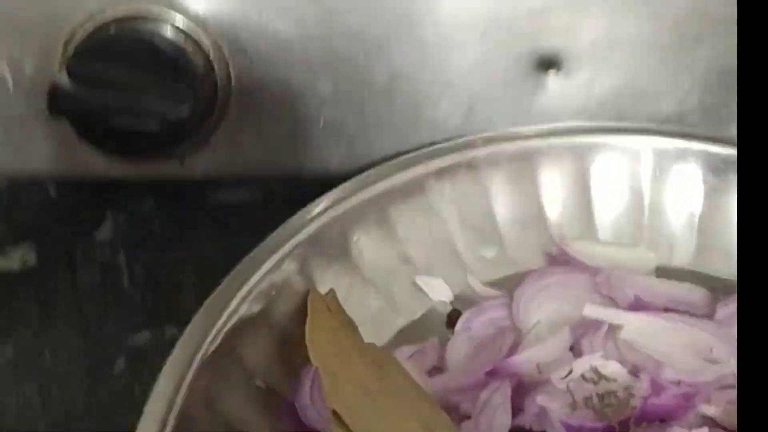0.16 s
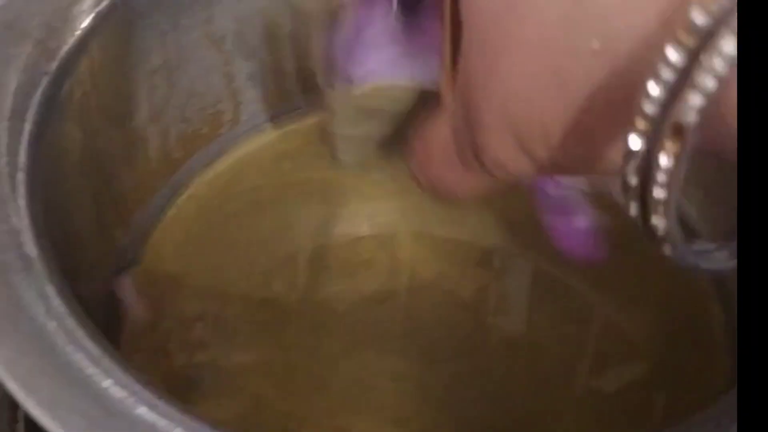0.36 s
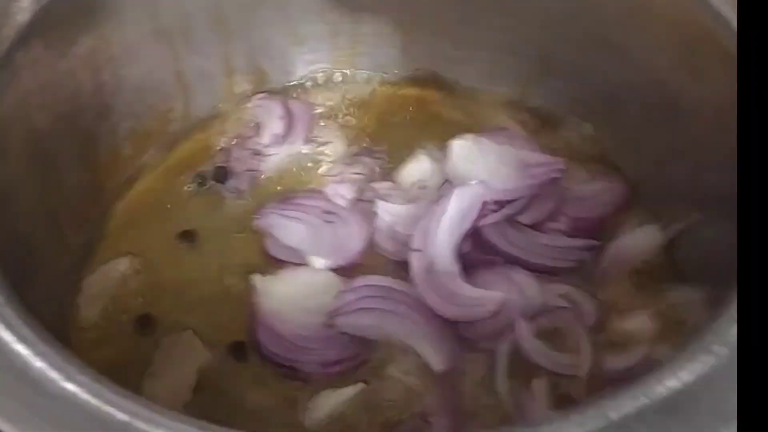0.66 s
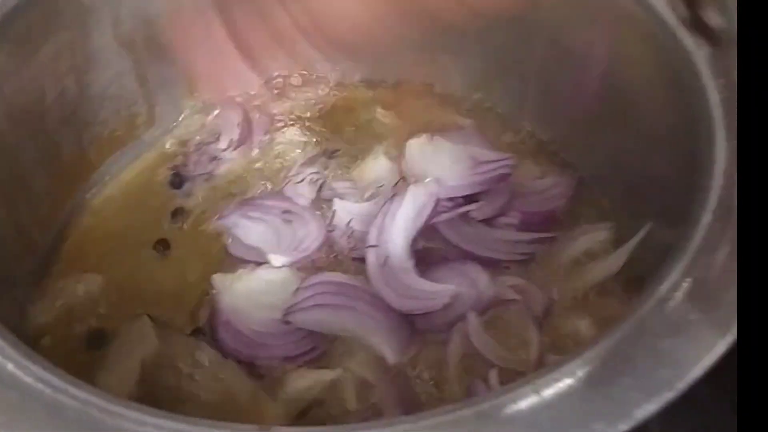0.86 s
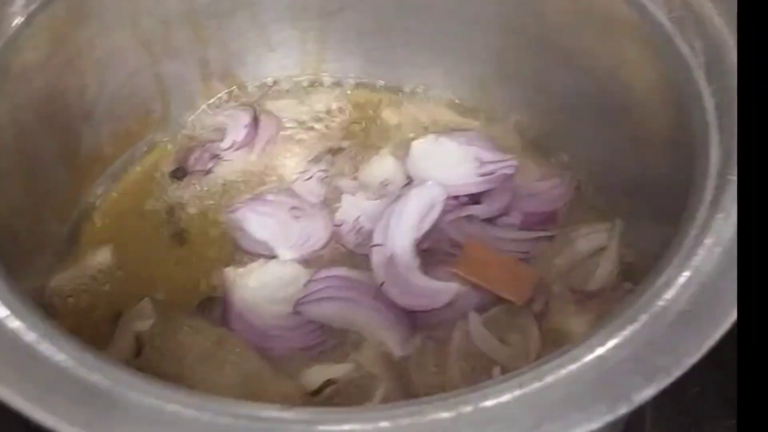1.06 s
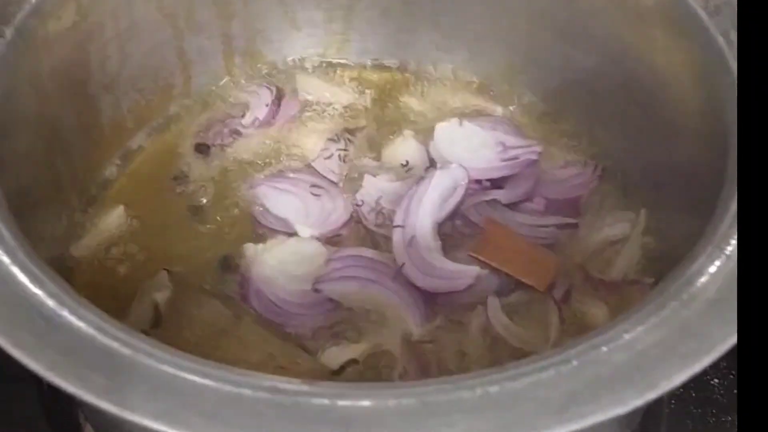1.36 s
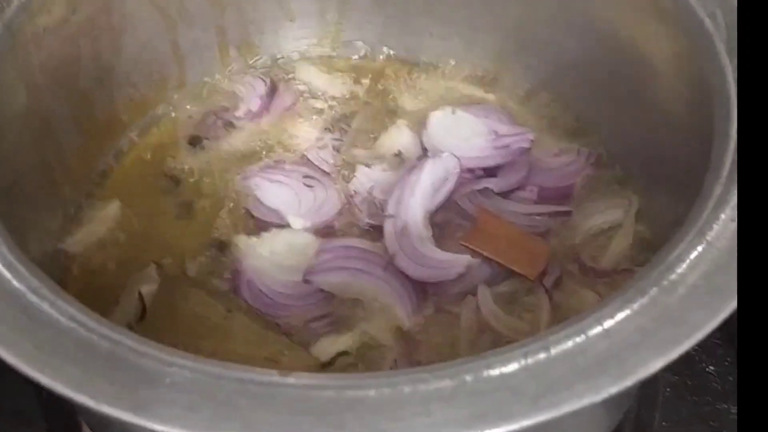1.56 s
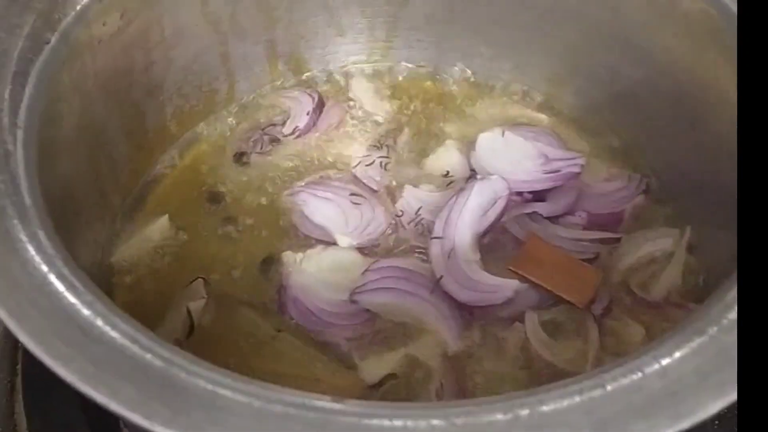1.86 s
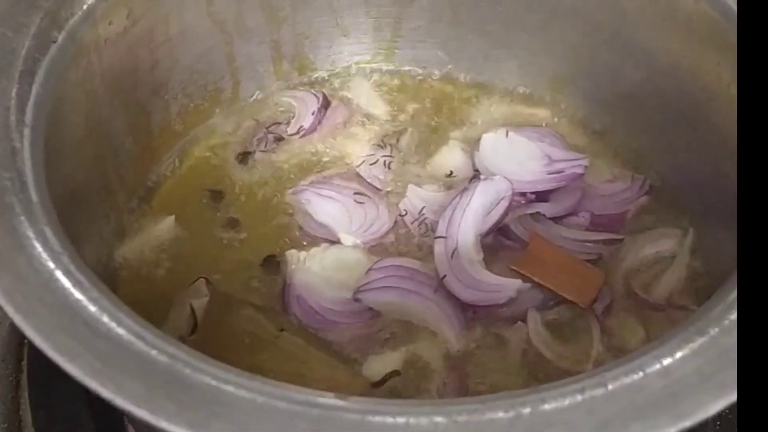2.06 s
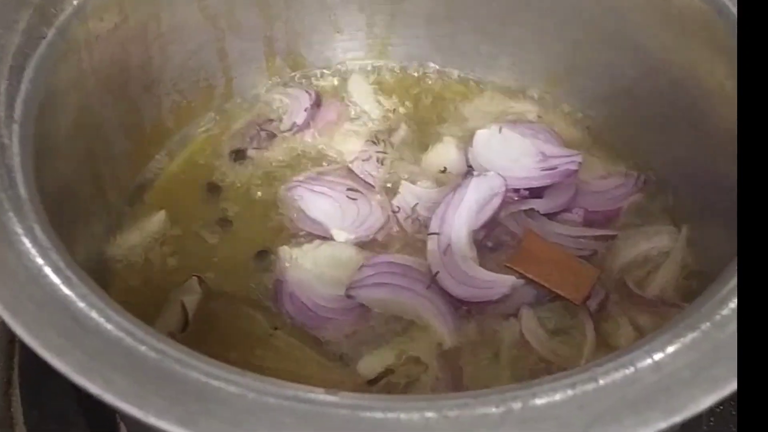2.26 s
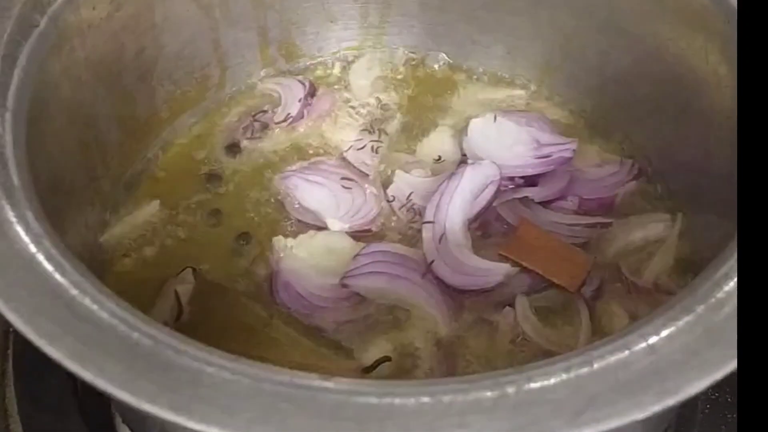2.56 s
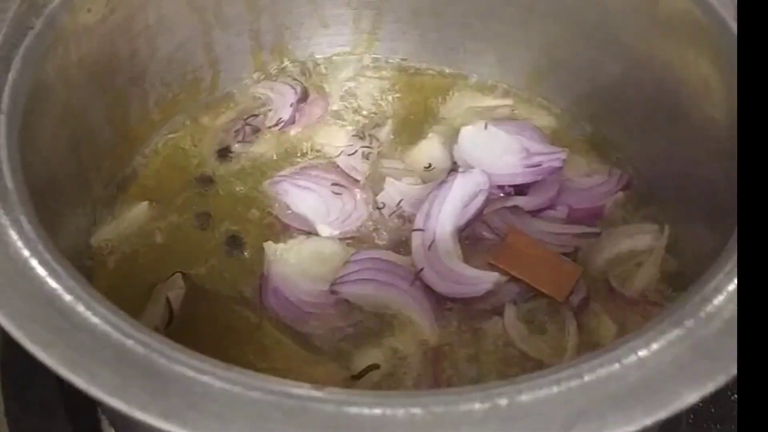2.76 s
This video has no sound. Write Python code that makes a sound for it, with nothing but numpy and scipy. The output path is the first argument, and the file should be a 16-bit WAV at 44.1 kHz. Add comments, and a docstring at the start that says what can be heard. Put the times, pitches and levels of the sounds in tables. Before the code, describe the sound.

Fierce frying hiss of onions hitting hot oil, popping and spitting, gradually easing in a pot

```python
"""Sliced onions drop into hot oil in a deep metal pot, heard by a two-port handheld microphone just above it.
First a quiet kitchen: shaped noise that sinks, a thin tick (short sine) and its faint hiss.
At about 0.3 s the room tone drops to a tenth; onions knock the pot's floor (decaying sines) and the boil starts.
Thousands of steam bubbles (random clicks through gliding sines) then fizz and gulp, fading as they go.
Droplets crack (noise bursts), bubbles sing, large ones ring the air in the pot; low thumps chirp downward."""
import sys
import numpy as np
from scipy import signal
from scipy.fft import rfft, irfft
from scipy.io import wavfile
from scipy.ndimage import uniform_filter1d

SR = 44100
rng = np.random.default_rng(int(sys.argv[2]) if len(sys.argv) > 2 else 0)


def wav_out(sig):
    """Save sig, one row per channel (or a flat mono array), as 16-bit PCM at SR to the path in sys.argv[1]."""
    wavfile.write(sys.argv[1], SR, np.round(np.clip(np.atleast_2d(sig).T, -1, 1) * 32767).astype(np.int16))


N = 127890


def amp(db):
    """Gain of a level in dB."""
    return 10 ** (np.asarray(db) / 20)


def evened(x):
    """Scales to unit RMS, all channels together."""
    return x / np.sqrt(np.mean(x ** 2) + 1e-20)


def read(points, hz):
    """Interpolates a (f/Hz, value) table along log frequency."""
    f, value = np.transpose(points)
    return np.interp(np.log(hz + 1), np.log(f + 1), value)


def add(mix, start_s, sound, pan_db):
    """Adds a sound in place; pan_db is left minus right."""
    part = mix[:, round(start_s * SR):][:, :sound.shape[-1]]
    part += amp([[pan_db / 2], [-pan_db / 2]]) * sound[..., :part.shape[1]]


def shared_pair(a, b, same):
    """Two channels of likeness same, mixed from independent a and b."""
    return np.array([a, same * a + np.sqrt(1 - same ** 2) * b])


# level of the boil's layers before flicker: [t/s, fizz level/dB, pot ring level/dB, low bubbling level/dB]
BOIL_LEVELS = [(0.302, -33, -64, -56), (0.321, -29.5, -65, -52), (0.35, -33.5, -72, -41.5),
               (0.366, -25.5, -73, -43), (0.408, -16, -52, -35.5), (.5, -15, -39.5, -35.5),
               (.9, -18, -35.5, -35), (1.25, -20, -39, -38.5), (1.6, -20.5, -39, -38),
               (1.7, -23.5, -45, -42), (2.0, -23.5, -31.5, -40.5), (2.2, -27, -48.5, -44),
               (2.9, -30, -48.5, -47.5)]
BOIL_START_S, BOIL_RISE_S = 0.303, 0.0011


def level(column):
    """One level curve of the boil as a gain."""
    rows = np.array(BOIL_LEVELS)
    t = np.arange(N) / SR
    start = np.clip((t - BOIL_START_S) / BOIL_RISE_S, 0, 1)
    return amp(np.interp(t, rows[:, 0], rows[:, column])) * start


# tilt between the ports: [f/Hz, left-right level/dB]
PORT_LEAN = [(30, 5.5), (250, -1.5), (700, 1.5), (1800, 2), (3000, -5), (4200, -2), (6800, -1.5),
             (9200, -11), (10900, 2.5), (13500, 1.5)]


def colour(x, spectrum):
    """Causal minimum-phase filter for each port: a spectrum plus half the ports' lean."""
    hz = abs(np.fft.fftfreq(4096, 1 / SR))
    gain_db = read(spectrum, hz) + np.array([[.5], [-.5]]) * read(PORT_LEAN, hz)
    log_gain = np.log(amp(np.maximum(gain_db, -100)))
    taps = np.fft.ifft(np.exp(np.conj(signal.hilbert(log_gain)))).real[:, :2048]
    return signal.oaconvolve(x, taps, axes=1)[:, :x.shape[-1]]


LARGEST_SPREADS = 3  # cap on click size


def clicks(per_s, spread_db):
    """Sparse clicks of random sign, a few of them large."""
    size_db = spread_db * np.minimum(rng.exponential(1, N), LARGEST_SPREADS)
    size = amp(size_db) * rng.choice([-1., 1.], N)
    return size * (rng.random(N) < per_s / SR)


def blip(hz, cycles, glide):
    """A bubble: a few gliding cycles that swell and fade."""
    u = np.arange(int(cycles * 2 / hz * SR) + 4) / SR * hz / cycles
    swell = (np.e * 2.08 * u * np.exp(-2.5 * u)) ** 3
    return swell * np.sin(2 * np.pi * cycles * u * (1 + glide * u / 2))


def scatter(train, lo_hz, hi_hz, cycles, lag_samples, count):
    """Deals clicks to bubbles of many sizes, each at its own place: own pan and own lag between the ports."""
    kind, out = rng.integers(0, count, N), np.zeros((2, N))
    for k, hz in enumerate(np.geomspace(lo_hz, hi_hz, count)):
        u = rng.random(4)
        bubble = blip(hz, cycles * 16.0 ** (u[0] - .5), 0.16 * u[1] - .2) * hz
        x = signal.oaconvolve(train * (kind == k), bubble)[:N]
        lagged = np.roll(x, int(lag_samples * (2 * u[3] - 1)))
        out += [x * (.5 + u[2]), lagged * (1.5 - u[2])]
    return out


def whiten(x):
    """Evens out the long-term spectrum."""
    z = rfft(x)
    power = uniform_filter1d(abs(z) ** 2, 1500, axis=1)
    return evened(irfft(z / np.sqrt(power + 1e-9), N))


# spectrum of fizz and cracks: [f/Hz, relative level/dB per Hz]
FIZZ_SPECTRUM = [(710, -17), (1200, -35.5), (1460, -25), (1720, -8), (2150, -7.5), (2480, -7), (3740, -4.5),
                 (4360, -1.5), (5070, -3.5), (7330, -1), (9410, 3), (10900, 2), (13600, -15),
                 (14700, -11.5), (15600, -60)]
BUBBLES_PER_S, BUBBLE_SPREAD_DB, BUBBLE_MEDIAN_CYCLES = 9000, 4.2, 7.0
SPITS_PER_S, SPIT_SPREAD_DB, SPIT_S = 110, 2.5, .0006
SPIT_DB, HISS_DB = -10, -3  # against the bubbles


def fizz():
    """Small bubbles burst and droplets spit broad cracks over a fine hiss."""
    train = clicks(BUBBLES_PER_S, BUBBLE_SPREAD_DB)
    bubbles = whiten(scatter(train, 1263, 14850, BUBBLE_MEDIAN_CYCLES, 9, count=60))
    u = np.arange(200) / SR / SPIT_S
    spit_envelope = signal.oaconvolve(abs(clicks(SPITS_PER_S, SPIT_SPREAD_DB)), u * np.exp(-u))[:N]
    spits = spit_envelope * rng.standard_normal((2, N))
    hiss = rng.standard_normal((2, N))
    mix = bubbles + amp(SPIT_DB) * evened(spits) + amp(HISS_DB) * hiss
    return evened(colour(mix, [(500, -36.5)] + FIZZ_SPECTRUM)) * level(column=1)


# likeness of noise at the ports: [f/Hz, left-right likeness/0..1]
LOW_LIKENESS = [(30, 0.095), (300, 0.95), (900, 0.18), (1400, 0.055)]


def pair_noise(spectrum):
    """Coloured noise whose ports are most alike near 300 Hz."""
    a, b = rfft(rng.standard_normal((2, N)))
    same = np.clip(read(LOW_LIKENESS, np.fft.rfftfreq(N, 1 / SR)), 0, 1)
    return evened(colour(irfft(shared_pair(a, b, same), N), spectrum))


# spectrum of the low bubbling: [f/Hz, relative level/dB per Hz]
LOW_SPECTRUM = [(15, 9), (25, -32.5), (123, -14), (344, -9.5), (437, -1.5), (484, -6.5), (648, 3),
                (1500, 1), (1950, -8.5), (3300, -120)]
GULPS_PER_S, GULP_SPREAD_DB, GULP_DB = 700, 2, -4.5  # level against the wash


def bubbling():
    """Larger bubbles gulp over a low wash."""
    gulps = whiten(scatter(clicks(GULPS_PER_S, GULP_SPREAD_DB), 119.0, 1420, 2.5, 27.0, count=16))
    mix = amp(GULP_DB) * evened(colour(gulps, LOW_SPECTRUM)) + pair_noise(LOW_SPECTRUM)
    return evened(mix) * level(column=3)


POT_HZ, POT_WIDTH_HZ, POT_RISE_S = 1745, 135, .0006
POT_DETUNE = .025  # fraction of pitch


def pot_ring(hz):
    """The air in the pot, struck once: a decaying resonance."""
    t = np.arange(1500) / SR
    envelope = (1 - np.exp(-t / POT_RISE_S)) ** 2 * np.exp(-np.pi * POT_WIDTH_HZ * t)
    return envelope * np.sin(2 * np.pi * hz * t)


RINGS_PER_S, RING_SPREAD_DB = 350, 4.0
POT_LIKENESS = 0.71  # left-right, 0..1


def hollow():
    """Bursts keep ringing the air in the pot at two close pitches; both ports hear it largely alike."""
    a, b = clicks(RINGS_PER_S, RING_SPREAD_DB), clicks(RINGS_PER_S, RING_SPREAD_DB)
    strikes = shared_pair(a, b, POT_LIKENESS)
    ring = pot_ring(POT_HZ * (1 - POT_DETUNE)) + pot_ring(POT_HZ * (1 + POT_DETUNE))
    return evened(signal.oaconvolve(strikes, ring[None])[:, :N]) * level(column=2)


FLICKER_DB = 1.0


def flicker():
    """Fast and slow unrest of the boil (dB), shared by all its layers."""
    fast, slow = (evened(uniform_filter1d(uniform_filter1d(rng.standard_normal(N), n), n))
                  for n in (500, 3000))
    return FLICKER_DB * (fast + slow / 2)


# droplets crack: [t/s, level before colouring/dB, left-right level/dB]
DROPLET_CRACKS = [(0.3994, -8.5, -4), (0.653, -7, 9), (0.730, -3, 3), (0.8564, -13, -2), (0.936, -21, -4),
                  (1.057, -10.5, -2.5), (1.096, -5, -2), (1.107, -29, -8), (1.1704, -13.5, -12),
                  (1.199, -13, -1), (1.222, -7.5, -0.5), (1.436, -8.5, -16), (1.444, -11, -10),
                  (1.567, -10, -7), (1.604, -11.5, -9), (1.632, -7, -7), (1.7894, -7, -1),
                  (1.8584, -12, -10), (1.8999, -9, -6), (1.9158, -2, 3.5), (1.9897, -4.5, 6),
                  (2.132, -9, 3), (2.1358, -2, -1), (2.3132, -17, -11), (2.656, -4, 1), (2.7688, -10, -8.5),
                  (2.7761, -12.5, -10)]
# bubbles sing: [t/s, f/Hz, level before envelope/dB, length/cycles, left-right level/dB]
SINGING_BUBBLES = [(0.401, 3370, -9, 4.7, -3), (0.9844, 2830, -12, 9, -14), (1.057, 4560, -6.5, 6.0, -7),
                   (1.603, 7240, -8, 16, -8), (1.7893, 2200, -5.5, 4.3, -3), (1.8742, 2700, -13, 9.2, -6),
                   (2.377, 3700, -15, 7.9, -8), (2.6557, 3630, -19.5, 16, -10),
                   (2.7685, 3730, -13, 14.6, -12.5), (2.841, 7200, -10, 26, -5.5)]
# large bubbles burst: [t/s, pot ring level before envelope/dB, falling gulp level/dB]
LARGE_BURSTS = [(0.601, -35, -26), (0.750, -17, -24.5), (1.057, -13.5, -28), (1.1055, -12.5, -26.5),
                (1.170, -14, -29), (1.312, -15.5, -31.5), (1.410, -17, -28), (1.4352, -13, -22),
                (1.477, -9.5, -29), (1.566, -17, -49), (1.627, -30, -37), (1.7874, -10.5, -34),
                (1.9171, -8.5, -24.5), (1.939, 3.5, -25), (1.958, -12, -33), (2.0285, -11, -30),
                (2.135, -22, -44), (2.6564, -14, -29.5)]
CRACK_S, CRACK_LOW_HZ, CRACK_BODY_HZ, CRACK_BODY_DB = .0006, 600, 3500, -10
POP_GLIDE = -.12
GULP_SWEEP_HZ, GULP_LOW_HZ, GULP_FALL_S, GULP_DECAY_S = 1500, 620, .0016, .0024  # sweep starts above low


def pops():
    """Droplets crack (noise), bubbles sing a falling blip, large ones gulp (falling sine) and ring the pot."""
    crack, tone = np.zeros((2, 2, N))
    u, t = np.arange(400) / SR / CRACK_S, np.arange(1500) / SR
    for start_s, db, pan_db in DROPLET_CRACKS:
        noise = rng.choice([-1., 1.], (2, 400))
        add(crack, start_s, amp(db) * noise * (u * np.exp(1 - u)) ** 2, pan_db)
    for start_s, hz, db, cycles, pan_db in SINGING_BUBBLES:
        add(tone, start_s, amp(db) * blip(hz, cycles, POP_GLIDE), pan_db)
    gulp_envelope = t / GULP_DECAY_S * np.exp(1 - t / GULP_DECAY_S)
    for start_s, ring_db, gulp_db in LARGE_BURSTS:
        size, detune = np.tanh(rng.standard_normal(2))
        gulp_hz = GULP_LOW_HZ * (1 + size / 10) + GULP_SWEEP_HZ * np.exp(-t / GULP_FALL_S)
        phase = 2 * np.pi * np.cumsum(gulp_hz) / SR
        add(tone, start_s, amp(gulp_db) * np.sin(phase) * gulp_envelope, 0)
        add(tone, start_s, amp(ring_db) * pot_ring(POT_HZ * (1 + POT_DETUNE * detune)), 0)
    band = signal.butter(2, [CRACK_LOW_HZ, CRACK_BODY_HZ], "band", fs=SR)
    body = signal.lfilter(*band, crack)
    return colour(crack, FIZZ_SPECTRUM) + amp(CRACK_BODY_DB) * body + tone


# low thumps: [t/s, level before envelope/dB, left-right level/dB]
LOW_THUMPS = [(0.622, -48, -23), (0.698, -44, -15), (0.753, -34, -5), (0.848, -47, -31), (1.058, -44, -30),
              (1.914, -30, -7), (1.99, -33, -31), (2.135, -34.5, -17), (2.655, -42.5, -23)]
# onions knock the pot's floor: [t/s, level before envelope/dB, f/Hz, t60/s]
ONION_KNOCKS = [(0.319, -33, 660, 0.029), (0.357, -21.5, 662.5, 0.16), (0.374, -18, 648, 0.093),
                (0.409, -30, 648, 0.23)]
CHIRP_SWEEP_HZ, CHIRP_LOW_HZ, CHIRP_FALL_S, THUMP_DECAY_S = 1400, 35, .0028, .011  # sweep starts above low
KNOCK_RISE_S = 0.00059


def thuds():
    """Low thumps, each smeared into a fast downward chirp by the recorder; knocks ring at one pitch."""
    out, t = np.zeros((2, N)), np.arange(3000) / SR
    phase = 2 * np.pi * np.cumsum(CHIRP_LOW_HZ + CHIRP_SWEEP_HZ * np.exp(-t / CHIRP_FALL_S)) / SR
    thump = np.sin(phase) * (1 - np.exp(-2 * t / CHIRP_FALL_S)) * np.exp(-t / THUMP_DECAY_S)
    for start_s, db, pan_db in LOW_THUMPS:
        add(out, start_s, amp(db) * thump, pan_db)
    for start_s, db, hz, t60_s in ONION_KNOCKS:
        envelope = amp(db - 60 * t / t60_s) * (1 - np.exp(-t / KNOCK_RISE_S))
        add(out, start_s, envelope * np.sin(2 * np.pi * hz * t), 0)
    return out


GUST_S, GUST_DB, GUST_TURN_S, GUST_DECAY_S, GUST_PAN_DB = 1.994, -35, .028, .032, -28
GUST_RISE_S = .0028


def gust():
    """A gust pushes on the ports, mostly the right, and slowly swings back through zero."""
    out, t = np.zeros((2, N)), np.arange(12000) / SR
    push = (1 - np.exp(-t / GUST_RISE_S)) ** 2 * (1 - t / GUST_TURN_S) * np.exp(-t / GUST_DECAY_S)
    add(out, GUST_S, amp(GUST_DB) * push, GUST_PAN_DB)
    return out


ECHO_DB, ECHO_T60_S = -9, .05


def echoes(x):
    """Short tail of the pot's walls and the stove corner: sparse decaying random reflections."""
    t = np.arange(4000) / SR
    sparse = rng.standard_normal((2, 4000)) * (rng.random((2, 4000)) < .1)
    tail = sparse * amp(-60 * t / ECHO_T60_S) * (t > .002)
    tail /= np.linalg.norm(tail, axis=1)[:, None]
    return amp(ECHO_DB) * signal.oaconvolve(x, tail, axes=1)[:, :N]


# spectrum of the room tone: [f/Hz, relative level/dB per Hz]
KITCHEN_SPECTRUM = [(20, -20), (66, -9.5), (131, -25.5), (340, -16.5), (430, -21.5), (2430, -28),
                    (4750, -37), (6600, -30), (7100, -25), (7700, -29.5), (15000, -40.5)]
KITCHEN_START_DB, KITCHEN_SINK_DB_PER_S = -53.5, -37
KITCHEN_END_S, KITCHEN_FADE_S = 0.297, 0.013
TICK_S, TICK_HZ, TICK_DB, TICK_PAN_DB = 0.1982, 9800, -8, -5.5
TICK_HISS_DB, TICK_HISS_T60_S = -54, 0.74


def kitchen():
    """Quiet sinking room tone, one thin tick with a faint hiss after it; all fade to a tenth."""
    t, hiss_t = np.arange(N) / SR, np.arange(5000) / SR
    out = amp(KITCHEN_START_DB + KITCHEN_SINK_DB_PER_S * t) * pair_noise(KITCHEN_SPECTRUM)
    hiss = signal.lfilter(*signal.iirpeak(TICK_HZ, 4.0, SR), rng.standard_normal((2, 5000)))
    add(out, TICK_S, amp(TICK_HISS_DB - 60 * hiss_t / TICK_HISS_T60_S) * evened(hiss), TICK_PAN_DB)
    add(out, TICK_S, amp(TICK_DB) * blip(TICK_HZ, 11.4, -.05), TICK_PAN_DB)
    return out * np.clip((KITCHEN_END_S - t) / KITCHEN_FADE_S, .1, 1)


def scene():
    """Sums all sources; the low layers flicker 2.58 times as deep in dB as the fizz."""
    near, unrest_db = pops(), flicker()
    boil = fizz() * amp(unrest_db) + (hollow() + bubbling()) * amp(2.58 * unrest_db)
    return boil + near + echoes(near) + thuds() + gust() + kitchen()


LEFT_LAG_SAMPLES, EDGE_HZ = 2, 16300


def record(dry):
    """The left port hears a little late; full scale, then the band limit."""
    ports = np.clip([np.roll(dry[0], LEFT_LAG_SAMPLES), dry[1]], -1, 1)
    low_pass = signal.firwin(511, EDGE_HZ, window=("kaiser", 12), fs=SR)
    return signal.oaconvolve(ports, low_pass[None], "same")


dry = scene()
out = record(dry)
wav_out(out)
```